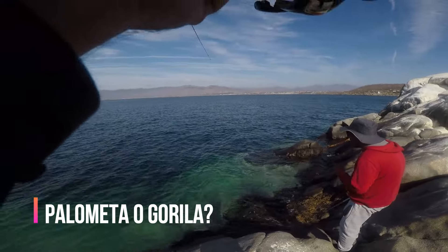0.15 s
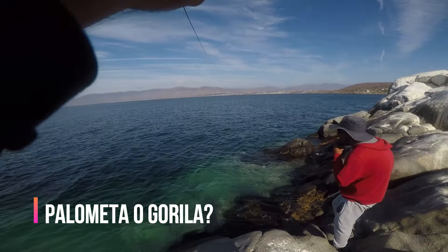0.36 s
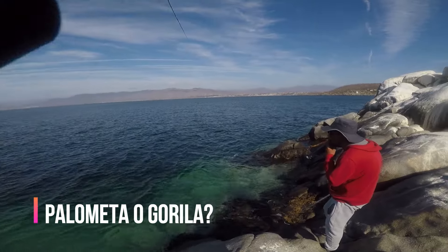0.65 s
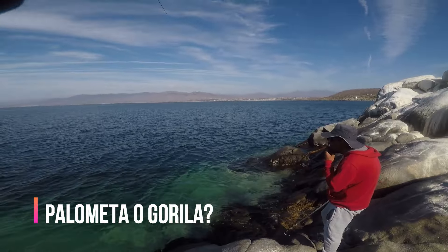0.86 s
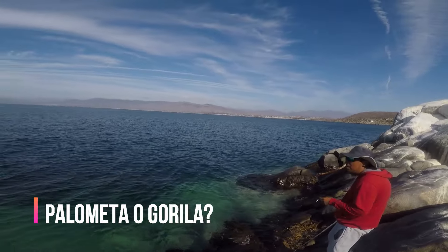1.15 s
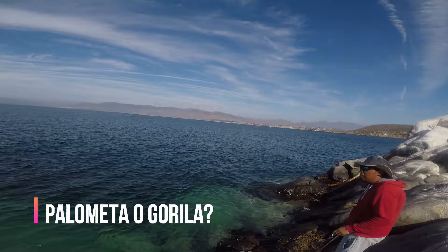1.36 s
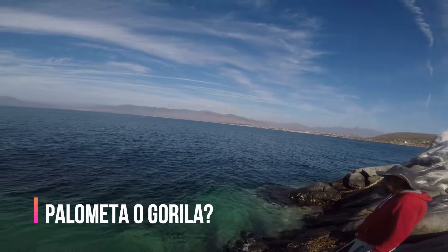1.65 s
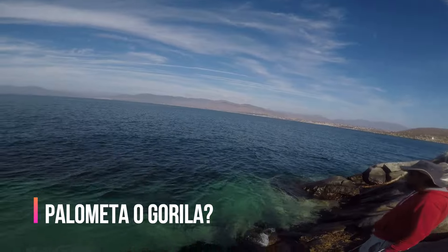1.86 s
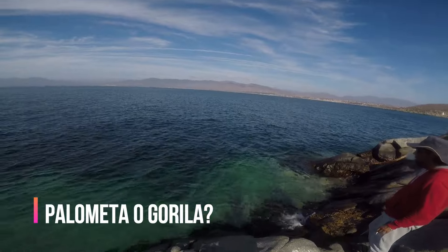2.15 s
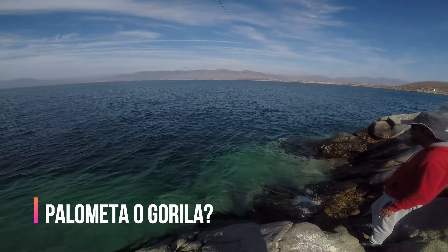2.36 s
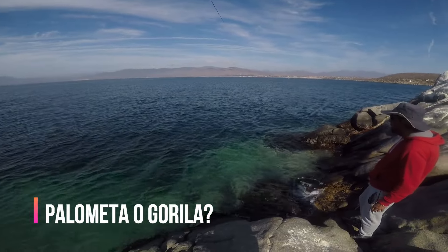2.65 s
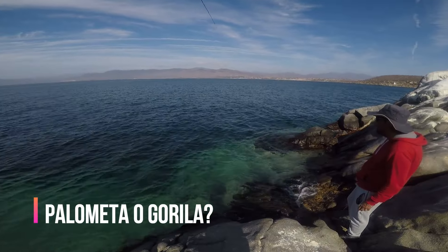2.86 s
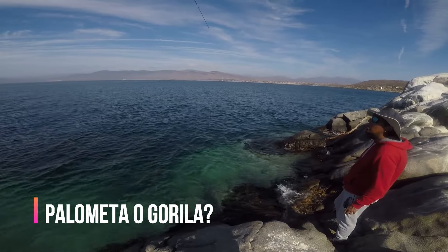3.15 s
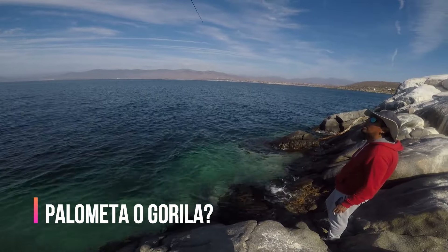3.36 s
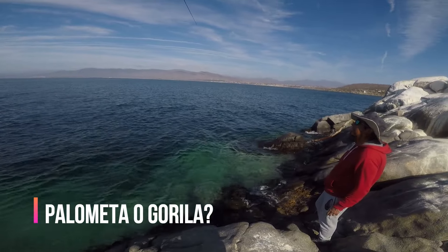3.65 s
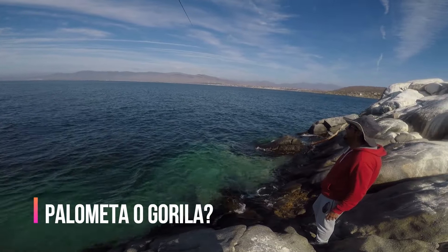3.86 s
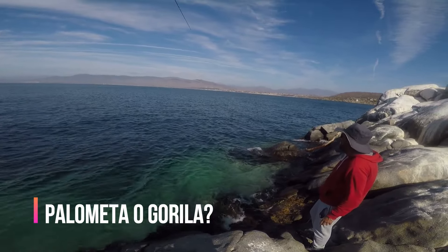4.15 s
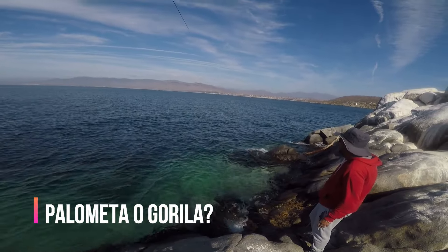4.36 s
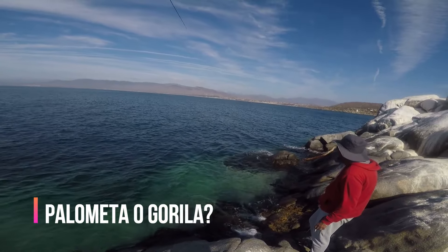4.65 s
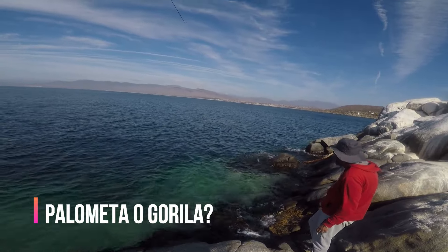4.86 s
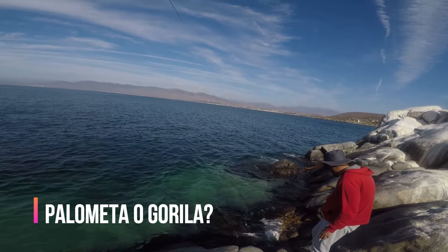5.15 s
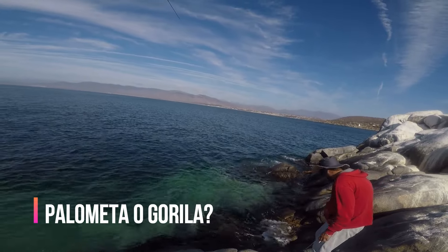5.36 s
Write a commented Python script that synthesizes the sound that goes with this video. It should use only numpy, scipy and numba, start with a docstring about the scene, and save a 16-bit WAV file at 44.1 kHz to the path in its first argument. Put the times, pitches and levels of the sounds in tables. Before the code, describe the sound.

Line pulls off a close fishing reel in two buzzing runs with clicks between, as wind buffets the microphone and water washes rocks.

```python
"""A hooked fish pulls line off a spinning reel just above a body-worn camera on a rocky shore.
Throughout, wind buffets the two microphone ports, the sea washes the rocks and hands knock the tackle.
First the drag's pawl snaps over its teeth in a short buzz, then the spool creeps in single clicks while
a sleeve swishes. At 2.3 s comes a hollow handling knock and the fish runs again: a long, wavering buzz
over the ring of the spool. From 3.8 s the reel is muted; it slows to a rasp and the image narrows."""
import sys
import numpy as np
from scipy import signal
from scipy.fft import rfft, irfft
from scipy.io import wavfile
from scipy.ndimage import uniform_filter1d
from numba import njit

SR = 44100
rng = np.random.default_rng(int(sys.argv[2]) if len(sys.argv) > 2 else 0)


def bounce(signal):
    """Save signal as a 16-bit WAV file at the path given by the first command-line argument."""
    frames = np.transpose(np.atleast_2d(signal))
    limited = np.clip(frames, -1, 1)
    pcm = np.round(limited * 32767).astype(np.int16)
    wavfile.write(sys.argv[1], SR, pcm)


N = 242972
TIME = np.arange(N) / SR
SIDE = np.array([[1], [-1]])


def undb(db):
    """Decibels to gain."""
    return 10 ** (np.asarray(db) / 20)


def curve(rows, column=1):
    """One table column, interpolated linearly in time."""
    rows = np.array(rows)
    return np.interp(TIME, rows[:, 0], rows[:, column])


def ramp(start_s, length_s):
    """Linear rise from 0 to 1, then held."""
    return np.clip((TIME - start_s) / length_s, 0, 1)


def walk(rate_hz):
    """Random steps, smoothed twice; spread near 1."""
    hold = int(SR / rate_hz)
    steps = rng.standard_normal(4096)[np.arange(N) // hold % 4096]
    return 1.3 * uniform_filter1d(uniform_filter1d(steps, hold), hold)


def noise(spectrum, correlation):
    """Stereo noise at rms 1, shaped by rows of freq_hz, level_db."""
    hz, db = np.transpose(spectrum)
    gain = undb(np.interp(np.log(np.arange(N // 2 + 1) * SR / N + 1), np.log(hz), db))
    mid, side = irfft(rfft(rng.standard_normal((2, N))) * gain, N)
    ports = np.sqrt(1 + correlation) * mid + np.sqrt(1 - correlation) * side * SIDE
    return ports / np.sqrt(np.mean(ports ** 2))


def impulses(times_s, sizes):
    """Band-limited impulses placed between samples."""
    at = np.asarray(times_s)[:, None] * SR
    index = np.floor(at).astype(int) + np.arange(-7, 9)
    pulses = np.asarray(sizes)[:, None] * np.sinc(index - at) * np.sinc((index - at) / 8)
    out = np.zeros(N)
    np.add.at(out, np.clip(index, 0, N - 1), pulses)
    return out


def convolve(x, response):
    """Pass a sound through a response, channel by channel."""
    return signal.fftconvolve(np.atleast_2d(x), np.atleast_2d(response), axes=1)[:, :N]


def resonate(x, resonances, size=2048):
    """Ring a body's broad resonances: minimum phase, mean energy 1, so their levels are relative."""
    hz = np.arange(size // 2 + 1) * SR / size
    power = sum(undb([[left_db], [right_db]]) ** 2 / (1 + 2 * ((hz - freq_hz) / width_hz) ** 2) ** 3
                for freq_hz, width_hz, left_db, right_db in resonances)
    cepstrum = irfft(np.log(power / power.mean() + 1e-7) / 2)
    cepstrum[:, 1:size // 2] *= 2
    cepstrum[:, size // 2 + 1:] = 0
    return convolve(x, irfft(np.exp(rfft(cepstrum))))


@njit
def band_pass(x, centre_hz, width_hz):
    """State-variable band-pass with a moving centre, gain 1 there."""
    out, band_state, low_state = np.empty(len(x)), 0., 0.
    for i in range(len(x)):
        gain, damping = np.tan(np.pi * centre_hz[i] / SR), width_hz / centre_hz[i]
        band = (band_state + gain * (x[i] - low_state)) / (1 + gain * (gain + damping))
        band_state, low_state = 2 * band - band_state, low_state + 2 * gain * band
        out[i] = damping * band
    return out


# wash on the rocks: time_s, level_db
WASH_LEVEL = [(0, -42.5), (.7, -40.5), (1.1, -40.5), (2.2, -33), (2.75, -39), (3.6, -36.5), (3.93, -36.5),
              (4.27, -41), (4.65, -35), (5.15, -34), (5.51, -36.5)]
# water spectrum: freq_hz, level_db
WASH_SPECTRUM = [(200, -58), (420, 3), (600, 7.5), (800, 7), (1050, -0.5), (1500, -1.5), (2400, -8),
                 (4000, -11), (7000, -16.5), (10000, -26), (15000, -44)]
def shore():
    """Water washes over the rocks, swelling and flickering."""
    return noise(WASH_SPECTRUM, correlation=.5) * undb(curve(WASH_LEVEL) + .7 * walk(11) + 1.6 * walk(45))


# gusts: time_s, strength_db, left_minus_right_db
WIND_GUSTS = [(0, -21, -8), (.35, -26.5, -1), (.78, -24.5, -2), (.9, -21, -2), (1.08, -16.5, 5),
              (1.2, -20.5, -2), (1.47, -11.5, -0.5), (1.63, -20, 3), (1.88, -17, -3), (2.03, -17, 4),
              (2.3, -18.5, 2.5), (2.56, -15, 6), (2.8, -19, -4), (3, -22.5, 2.5), (3.43, -21.5, -1.5),
              (3.55, -17, 14.5), (3.67, -25, 1), (3.8, -13.5, 8), (4.02, -16.5, 7), (4.25, -21.5, 3.5),
              (4.85, -24.5, 12), (5.51, -31, 12.5)]
# sharp buffets: peak_s, half_length_s, level_db
WIND_BUFFETS = [(1.49, .035, -21), (3.9, 0.12, -23), (3.997, .012, -35), (4.145, 0.0085, -23),
                (4.287, 0.011, -23), (4.433, 0.026, -22.5), (4.616, 0.014, -24), (4.668, 0.013, -26),
                (4.735, 0.024, -23), (4.859, 0.029, -23), (5.169, 0.0091, -22)]
# wind spectra: freq_hz, level_db
RUMBLE_SPECTRUM = [(4, -29), (14, 3), (25, -2), (45, -1), (62, -2), (100, -3), (140, -6.5), (200, -17.5),
                   (320, -25.5), (700, -98)]
FLUTTER_SPECTRUM = [(80, -2), (150, 3.5), (240, 1.5), (330, -3), (480, -10.5), (700, -23), (1200, -26.5),
                    (3000, -32), (8000, -70), (14000, -72)]
BUFFET_SPECTRUM = [(70, -7), (170, 5.5), (280, 2.5), (420, -2), (600, -7.5), (900, -19), (2500, -71),
                   (10000, -70)]
def wind(flutter_db_per_gust_db=1.308):
    """Eddies hit each port separately: gusts drive a rumble and a rougher flutter, with a few buffets."""
    gust_db = curve(WIND_GUSTS) + 1.5 * walk(21)
    pan_db = curve(WIND_GUSTS, column=2) * SIDE / 2
    rumble = noise(RUMBLE_SPECTRUM, correlation=.0093) * undb(gust_db + pan_db + .87 * walk(30))
    flutter_db = -2 + flutter_db_per_gust_db * gust_db + .38 * pan_db + 2.2 * walk(70)
    flutter = noise(FLUTTER_SPECTRUM, correlation=.015) * undb(flutter_db)
    bursts = sum(undb(level_db) * np.exp(-((TIME - peak_s) / half_length_s) ** 2)
                 for peak_s, half_length_s, level_db in WIND_BUFFETS)
    return rumble + flutter + bursts * noise(BUFFET_SPECTRUM, correlation=.081)


# swishes: peak_s, rise_s, fall_s, level_db
SLEEVE_SWISHES = [(1.1, .25, 1, -44), (1.921, 0.17, 0.1, -34.5), (2.38, 0.13, 0.1, -36)]
# cloth hiss and dull arm rub: freq_hz, level_db
CLOTH_SPECTRUM = [(500, -11), (1000, -25), (1600, 13.5), (2600, 6.5), (3600, 4.5), (4700, -6), (5800, 2),
                  (7200, 7), (8500, -4), (11000, -11), (15000, -32)]
RUB_SPECTRUM = [(200, 8), (450, 8), (800, 15), (1400, -0.5), (3000, -42)]
def sleeve():
    """Cloth rubs in small catches as the arm pumps the rod."""
    swell = sum(undb(level_db) * np.exp(-((TIME - peak_s) / np.where(TIME < peak_s, rise_s, fall_s)) ** 2)
                for peak_s, rise_s, fall_s, level_db in SLEEVE_SWISHES)
    hiss = noise(CLOTH_SPECTRUM, correlation=0) * undb(2.5 * walk(120))
    rub = noise(RUB_SPECTRUM, correlation=.3) * undb(4 + 1.8 * walk(50))
    return swell * (hiss + rub)


# ring of the hollow knock: freq_hz, level_db
KNOCK_RING_SPECTRUM = [(200, -31), (380, -3), (560, 9), (800, -19), (1200, -33), (5000, -56)]
def hollow_knock(knock_s=2.275, decay_s=.081):
    """A hollow handling knock with a brief noisy ring near 560 Hz."""
    age = np.maximum(TIME - knock_s, 0) / decay_s
    envelope = np.minimum(10 * age, 1) * np.exp(-age)
    return noise(KNOCK_RING_SPECTRUM, correlation=.64) * undb(-21.5 + 4.2 * walk(80)) * envelope


def thuds(rows, rise_cycles, right_gain, right_lag_rad):
    """Soft blows die within a few cycles and reach the two ports out of step."""
    out = np.zeros((2, N))
    for start_s, level_db, pitch_hz in rows:
        start = int(start_s * SR)
        cycles = TIME[:min(SR // 4, N - start)] * pitch_hz
        swell = cycles / rise_cycles * np.exp(1 - cycles / rise_cycles)
        phase = 2 * np.pi * cycles
        ports = np.array([np.sin(phase), right_gain * np.sin(phase - right_lag_rad)])
        out[:, start:start + len(cycles)] += undb(level_db) * swell * ports
    return out


# dull blows: start_s, level_db, pitch_hz
HAND_KNOCKS = [(0.02, -18, 252), (0.295, -21.5, 260), (0.761, -19.5, 314), (0.798, -27, 960),
               (1.43, -3, 282), (1.474, -11, 231), (1.897, -18, 424), (2.285, -2.5, 530), (2.498, -8, 270),
               (4.649, -13, 657), (4.727, -16.5, 325), (5.066, -18, 690), (5.258, -14, 220)]
CAMERA_BUMPS = [(.885, -8, 65.1), (1.331, -28, 69), (2.43, -9.5, 74), (2.778, -8.5, 63), (3.238, -13.5, 93),
                (3.504, -8.5, 91), (4.841, -10, 93.55), (5.046, -10, 85), (5.13, -17, 76),
                (5.237, -14.5, 84.6), (5.375, -12.5, 69.8)]
# light taps: start_s, strength_db
FITTING_TAPS = [(1.3207, 5.5), (1.3614, 4), (1.4062, 1), (1.72, 1), (5.086, -8)]
# rod fittings: freq_hz, width_hz, left_db, right_db
FITTING_RESONANCES = [(1390, 350, 8, 5), (1830, 350, 5.5, 9), (2560, 1020, -36, -7.5)]
def handling():
    """Hands knock on the tackle, the camera is jolted and the rod fittings tap."""
    knocks = thuds(HAND_KNOCKS, rise_cycles=.47, right_gain=1, right_lag_rad=.53)
    bumps = thuds(CAMERA_BUMPS, rise_cycles=.49, right_gain=.58, right_lag_rad=.99)
    start_s, strength_db = np.transpose(FITTING_TAPS)
    return knocks + bumps + resonate(impulses(start_s, undb(strength_db)), FITTING_RESONANCES)


TEETH_PER_TURN = 18
def turns(run):
    """Spool turns since the start of a run, at its tabled speed."""
    return np.cumsum(curve(run) * (TIME >= run[0][0])) / SR / TEETH_PER_TURN


def teeth(run, speed_hz, ripple, flutter, jitter, wear_db=1.2, scatter_db=1.7):
    """Snap times and sizes of worn teeth; speed ripples once a turn and flutters as the washers slip."""
    unsteady = ripple * np.sin(2 * np.pi * turns(run)) + flutter * walk(90)
    running = (TIME >= run[0][0]) & (TIME <= run[-1][0])
    passed = np.cumsum(speed_hz * (1 + unsteady) * running) / SR
    tooth = np.arange(1, int(passed[-1]) + 1)
    time_error, size_error = rng.standard_normal((2048, 2))[:len(tooth)].T
    wear = rng.permutation(np.linspace(-1, 1, TEETH_PER_TURN))[tooth % TEETH_PER_TURN]
    times_s = np.interp(tooth, passed, TIME)
    period_s = 1 / np.interp(times_s, TIME, speed_hz)
    size_db = wear_db * wear + scatter_db * (size_error + .4 * np.interp(times_s, TIME, walk(60)))
    sizes = np.sqrt(period_s * SR) * undb(size_db)  # mean power near 1 at any speed
    return times_s + jitter * period_s * time_error, sizes


def rattle(decay_s, apart_hz, size=1024):
    """Echoes inside the reel smear every snap alike; the two ports differ in the treble."""
    common, left, right = rfft(rng.standard_normal((3, size)) * np.exp(-TIME[:size] / decay_s))
    hz = np.arange(size // 2 + 1) * SR / size
    spectrum = common + np.array([left, right]) * (hz / apart_hz) ** 2
    return irfft(spectrum / np.abs(spectrum))[:, :size // 2]


def pawl(times_s, sizes, chatter_db, chatter_s):
    """Each snap is a sharp blow, then a brief bright chatter of the pawl on the tooth."""
    blows = impulses(times_s, sizes)
    age = 2 * TIME[:SR // 40] / chatter_s
    bounces = (1 - np.exp(-3 * age)) * np.exp(-age)
    envelope = np.sqrt(np.maximum(convolve(blows ** 2, bounces / bounces.sum()), 0))
    chatter = envelope * noise([(1450, -9), (2200, 3), (3200, -2), (6000, -1), (12000, 1)], .35)
    snaps = convolve(blows, rattle(decay_s=.0009, apart_hz=9000))
    return (snaps + undb(chatter_db) * chatter) / np.hypot(1, undb(chatter_db))


def force(run, level_db, db_per_doubling, reference_hz=400):
    """Snap gain: faster teeth snap harder."""
    return undb(level_db + db_per_doubling * np.log2(curve(run) / reference_hz))


def glide(ports, turn, from_hz, to_hz, width_hz):
    """A resonance swells, slides down and fades once per turn."""
    phase = turn % 1
    centre_hz = from_hz * (to_hz / from_hz) ** phase
    return np.sin(np.pi * phase) * np.array([band_pass(port, centre_hz, float(width_hz)) for port in ports])


def swirl(snaps, turn, from_hz, to_hz, width_hz, peak_db):
    """The turning spool colours the snaps: a peak slides down repeatedly, a dip trailing it."""
    peak = (undb(peak_db) - 1) * glide(snaps, turn, from_hz, to_hz, width_hz)
    dip = .35 * glide(snaps, turn + .5, from_hz, to_hz, 2 * width_hz)
    swept = snaps + peak - dip
    middle_hz = np.full(N, np.sqrt(from_hz * to_hz))
    band = np.array([band_pass(port, middle_hz, .7 * abs(from_hz - to_hz)) for port in swept])
    return swept - .17 * band  # keeps the swept band's mean level


# metal spool at damping 1, tuning 1: freq_hz, t60_s, left_db, right_db
SPOOL_MODES = [(3885, 0.65, -7, -8.5), (3924, 0.22, -9.5, -14.5), (7285, 0.27, -7.5, -43),
               (7377, 0.21, -9.5, -8)]
def spool_ring(damping, upper_db, tuning=1):
    """Decaying modes of the spool, levels set by energy; rubbing washers shorten and flatten them."""
    age_s, out = TIME[:SR // 2], 0
    for freq_hz, t60_s, left_db, right_db in SPOOL_MODES:
        ring = np.sin(2 * np.pi * freq_hz * tuning * age_s) * undb(-60 * damping * age_s / t60_s)
        gain = undb(np.array([[left_db], [right_db]]) + upper_db * (freq_hz > 5000))
        out = out + gain * ring / np.linalg.norm(ring)
    return out


# single teeth: start_s, snap_db, ring_db, spring_re_snap_db, edge_re_snap_db
CREEP_TEETH = [(0.6634, -5, -1.5, -22, -6), (0.6912, -2.5, -2.5, -20, -14), (0.716, 1, -8, -12, -15),
               (0.7493, 0.5, -3.5, -10, -6), (0.8277, 0, -4, -17, -7.5), (1.4281, -5, -12, -10, -6),
               (1.463, -7, -2, -9, 1), (1.494, -5.5, -4, -6, -4), (1.522, 0, -3, -11, -4),
               (1.5554, -1, -12, -11, -4), (1.5888, -5.5, -5, 1, -2), (1.6224, -3.5, -2, -13, -7),
               (1.951, -0.5, -6, -23, -3), (1.9973, 2, -5, -20, -7), (2.023, 0, -12, -16, -3),
               (2.0436, -2.5, -6, -14, 5), (2.0649, 0, -7, -4, -8), (2.092, 0.5, -12.5, -14, -10),
               (2.278, -1, -9, -12, -26), (2.315, -1, -9, -14, -21), (2.33, -1, -6, -14, -2)]
# reel held overhead, reel held ahead, pawl spring, bright snap edge: freq_hz, width_hz, left_db, right_db
REEL_OVERHEAD = [(1462, 286, -1.5, -5), (1850, 1150, -19, -20), (3200, 960, -17.5, -14.5),
                 (4360, 650, -12, -14), (5720, 990, -9, -18), (6150, 920, -5, -9.5), (6900, 510, -5, -11),
                 (7640, 580, -2.5, -27.5), (9000, 780, -10.5, -7.5), (9620, 240, -24, -8),
                 (10460, 410, -8, -9.5), (12500, 900, -68, -36), (13300, 400, -18, -24),
                 (14550, 340, -36, -21)]
REEL_AHEAD = [(1454, 550, -10, -14), (2040, 1500, -22, -21.5), (3350, 860, -16.5, -15),
              (4380, 540, -14, -15.5), (5830, 1240, -10.5, -21), (6160, 320, -7, -13), (6640, 320, -6, -29),
              (7240, 810, 0, -7), (9050, 1600, -13, -11), (9630, 570, -20, -11), (10600, 420, -10, -19),
              (11380, 270, -13.5, -16.5), (12470, 660, -30, -19.5), (14580, 280, -17, -26)]
SPRING_PING = [(4500, 330, -1, -6), (4540, 125, 10, 2), (5430, 2700, -20, -16)]
SNAP_EDGE = [(8070, 2030, 11.5, 5), (11100, 4900, -6, -3)]
def creep(rod_lowered_s=1):
    """Between the runs single teeth slip past, the spring pings and the resting spool rings freely."""
    start_s, snap_db, ring_db, spring_db, edge_db = np.transpose(CREEP_TEETH)
    clicks = pawl(start_s, undb(snap_db), chatter_db=8, chatter_s=.0017)
    nearest = np.searchsorted((start_s[1:] + start_s[:-1]) / 2, TIME)
    raised = TIME < rod_lowered_s
    overhead = undb(-1.5) * resonate(clicks * raised, REEL_OVERHEAD)
    ahead = undb(.5) * resonate(clicks * ~raised, REEL_AHEAD)
    ping = resonate(clicks * undb(spring_db)[nearest], SPRING_PING)
    edge = resonate(clicks * undb(edge_db)[nearest], SNAP_EDGE)
    ring = convolve(impulses(start_s, undb(ring_db + 1)), spool_ring(1.15, upper_db=3, tuning=1.006))
    return overhead + ahead + ping + edge + ring


# spool speed: time_s, tooth_rate_hz
FIRST_SPEED = [(0, 304.4), (.02, 274.6), (.06, 328), (.078, 328.8), (.105, 398.5), (.135, 377.6),
               (.16, 325.7), (.2, 294.1), (.25, 239.5), (.3, 196), (.355, 243.3), (.385, 237.5),
               (.43, 176.5), (.48, 213.7), (.51, 184.6), (.56, 97.74), (.61, 95.1), (.65, 57.54)]
# spurts of spool ring in both runs: time_s, relative_db
RING_LEVEL = [(0, 1), (.07, -3), (.15, 6), (.22, -1), (.3, -2.5), (.46, 1), (.51, -3), (.57, 4.5),
              (.63, -3), (2.4, -8.5), (2.53, -4.5), (2.58, -5), (2.7, -15), (2.76, -6.5), (2.93, -4.5),
              (3.02, -9), (3.16, -12), (3.23, -2.5), (3.3, -13), (3.44, -12), (3.5, -0.5), (3.6, -11),
              (3.71, -12), (3.77, -9), (3.86, -16)]
def first_run(start_turn=.061):
    """The reel, held overhead, buzzes and runs down to separate clicks."""
    passing = teeth(FIRST_SPEED, curve(FIRST_SPEED), ripple=.03, flutter=.011, jitter=.01)
    snaps = pawl(*passing, chatter_db=1.5, chatter_s=.0026)
    snaps *= force(FIRST_SPEED, level_db=-19, db_per_doubling=4)
    turn = turns(FIRST_SPEED) + start_turn
    buzz = swirl(snaps, turn, from_hz=8800, to_hz=4600, width_hz=550, peak_db=7.5)
    ring = undb(curve(RING_LEVEL)) * convolve(snaps[0], spool_ring(damping=1.35, upper_db=-1.5))
    return resonate(buzz, REEL_OVERHEAD) + ring


def line_brake(depth=.22, every_s=.13, tight_s=2.665, end_s=3.44, fade_s=.17):
    """Speed factor: peeling line tightens and brakes the spool about every third turn, then lets go."""
    tight = np.cos(np.pi * (TIME - tight_s) / every_s) ** 4
    return 1 - depth * tight * (1 - ramp(end_s - fade_s, fade_s))


# spool speed before braking: time_s, tooth_rate_hz
LONG_SPEED = [(2.33, 88), (2.4, 185), (2.46, 262), (2.54, 310), (2.6, 385), (2.74, 436), (3, 422),
              (3.27, 420), (3.4, 436), (3.46, 428), (3.49, 490), (3.55, 512), (3.595, 465), (3.64, 500),
              (3.665, 465), (3.71, 474), (3.745, 430), (3.79, 498), (3.83, 436), (3.87, 470), (3.91, 430),
              (3.95, 500), (4, 434), (4.035, 480), (4.095, 412), (4.12, 465), (4.16, 410), (4.2, 434),
              (4.265, 405), (4.325, 465), (4.355, 390), (4.41, 378), (4.45, 315), (4.48, 320), (4.53, 282),
              (4.59, 316), (4.62, 294), (4.655, 302), (4.77, 218), (4.88, 214), (4.98, 178), (5.02, 148),
              (5.22, 120), (5.35, 84), (5.51, 53)]
# muted reel, low whine of the drag: freq_hz, width_hz, left_db, right_db
REEL_MUTED = [(1270, 370, -22, -3), (2120, 880, -24, -25), (3500, 310, -18, -15), (3860, 110, -1.5, 0.5),
              (4446, 520, -2, -5), (5690, 440, -4, -3.5), (7160, 550, -25, -35), (9460, 710, -15, -15.5),
              (11000, 1440, -19, -22), (12400, 2200, -21, -16.5), (14650, 370, -1, -12)]
DRAG_WHINE = [(1668, 350, 0, -4.5)]
def long_run(start_turn=.29, mute_s=3.79, mute_db_per_s=28):
    """The open reel buzzes and its spool sings in spurts; then it is muted and slows to a rasp."""
    speed_hz = curve(LONG_SPEED) * line_brake()
    turn = turns(LONG_SPEED) + start_turn
    passing = teeth(LONG_SPEED, speed_hz, ripple=.028, flutter=.007, jitter=.004)
    bright = pawl(*passing, chatter_db=-4.5, chatter_s=.002)
    bright *= force(LONG_SPEED, level_db=-20.5, db_per_doubling=3)
    bright *= undb(-mute_db_per_s * np.maximum(TIME - mute_s, 0))
    muted = pawl(*passing, chatter_db=-5, chatter_s=.0016)
    muted *= force(LONG_SPEED, level_db=-36.5, db_per_doubling=2) * ramp(mute_s, length_s=.35)
    ring = undb(curve(RING_LEVEL) - 2) * convolve(bright[0], spool_ring(damping=2.8, upper_db=2))
    flickering = muted * undb(3 * walk(70))
    spring = glide(flickering, turn + .15 * walk(40), from_hz=5200, to_hz=4050, width_hz=240)
    spring *= undb(12) * ramp(start_s=4.5, length_s=.86)  # comes through as the spool slows
    buzz = swirl(bright, 2 * turn + .12 * walk(30), from_hz=11500, to_hz=4200, width_hz=600, peak_db=6.5)
    rasp = swirl(muted, turn + .5, from_hz=7000, to_hz=4800, width_hz=400, peak_db=5)
    whine = undb(-16) * resonate(buzz, DRAG_WHINE)
    return resonate(buzz, REEL_AHEAD) + resonate(rasp, REEL_MUTED) + whine + ring + spring


def scene():
    """Reel, wind, sea, sleeve and handling at the two ports."""
    return first_run() + creep() + long_run() + wind() + hollow_knock() + shore() + sleeve() + handling()


def narrow(ports, below_hz=6900, side_db=-35):
    """Near the end, left and right draw together below the high treble."""
    side = (ports[0] - ports[1]) / 2
    low_side = signal.sosfiltfilt(signal.butter(4, below_hz, fs=SR, output="sos"), side)
    width = undb(side_db * ramp(start_s=4.145, length_s=.88))
    return ports - (1 - width) * low_side * SIDE


def record(dry):
    """The right port's cavity flips phase near resonance; the image narrows; the camera clips and filters."""
    cavity_hz, top_hz = 880, 15250
    cavity = signal.lfilter(*signal.iirpeak(cavity_hz, Q=1.5, fs=SR), dry[1])
    ports = narrow(np.array([dry[0], dry[1] - 2 * cavity]))
    low_pass = signal.ellip(8, .2, 80, top_hz, fs=SR, output="sos")
    return signal.sosfilt(low_pass, np.clip(ports, -.9, .9))


dry = scene()
out = record(dry)
bounce(out)
```